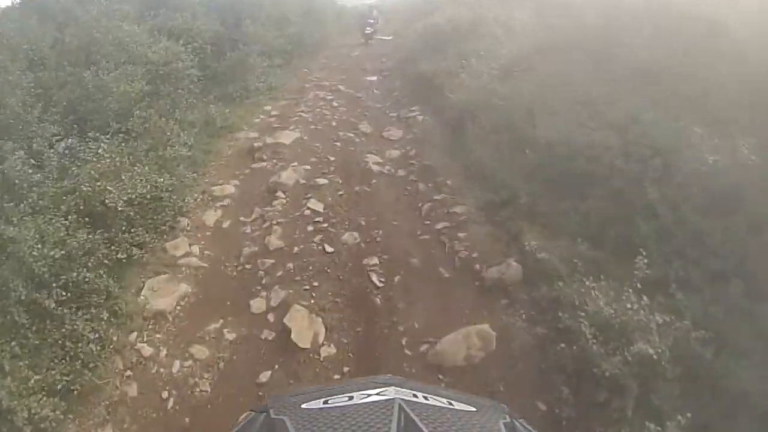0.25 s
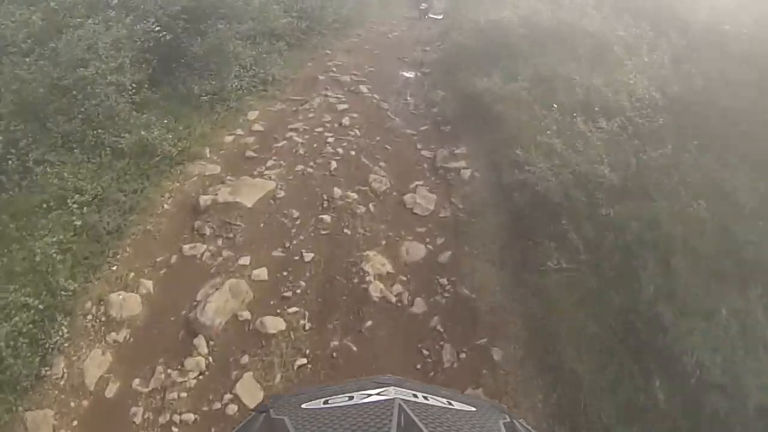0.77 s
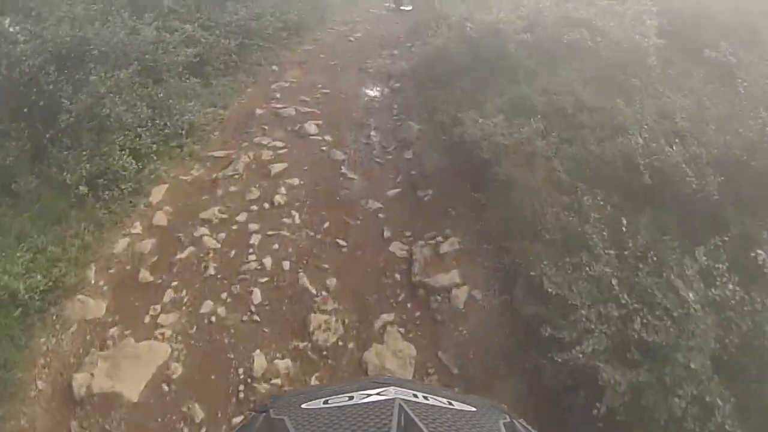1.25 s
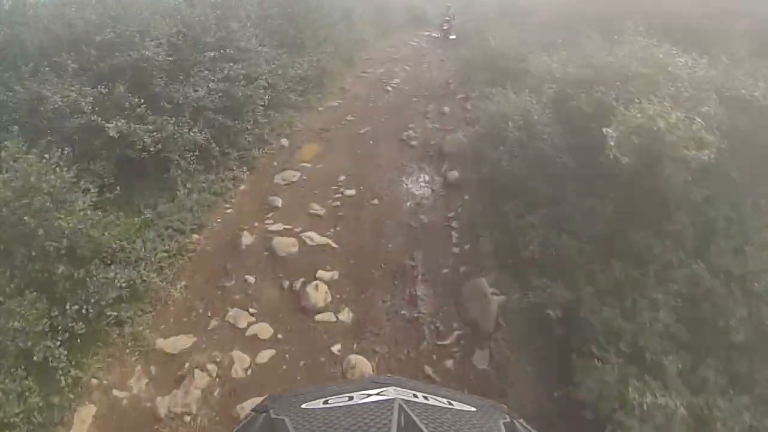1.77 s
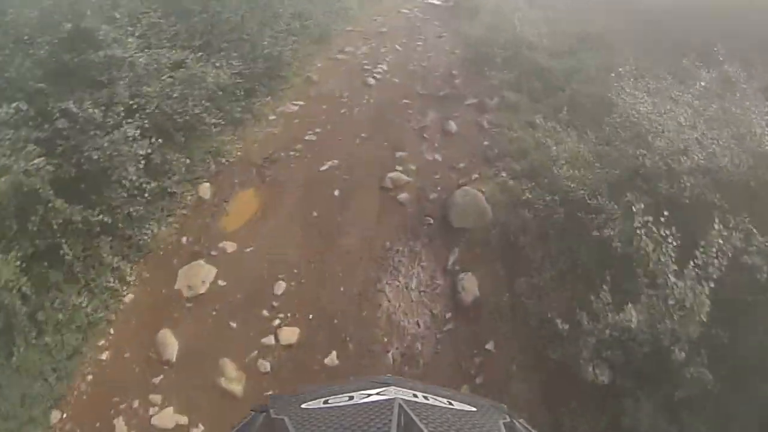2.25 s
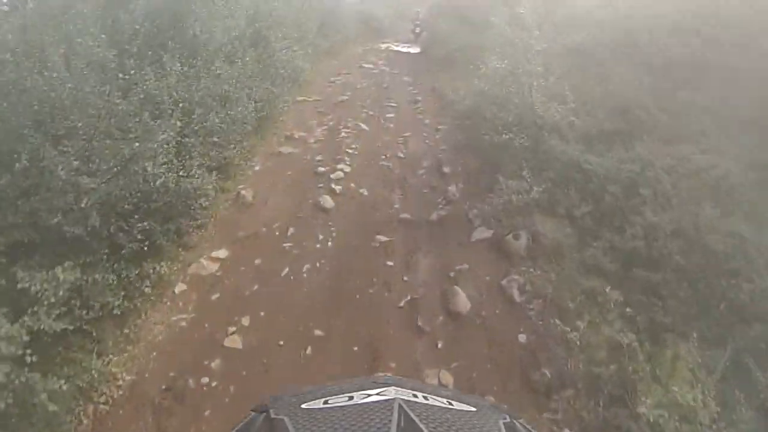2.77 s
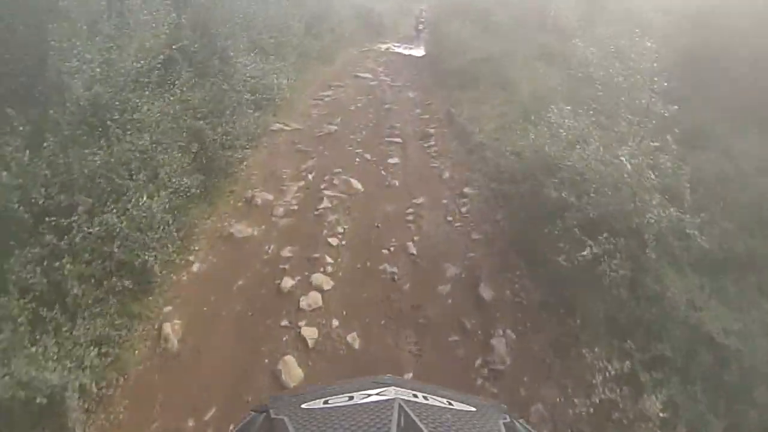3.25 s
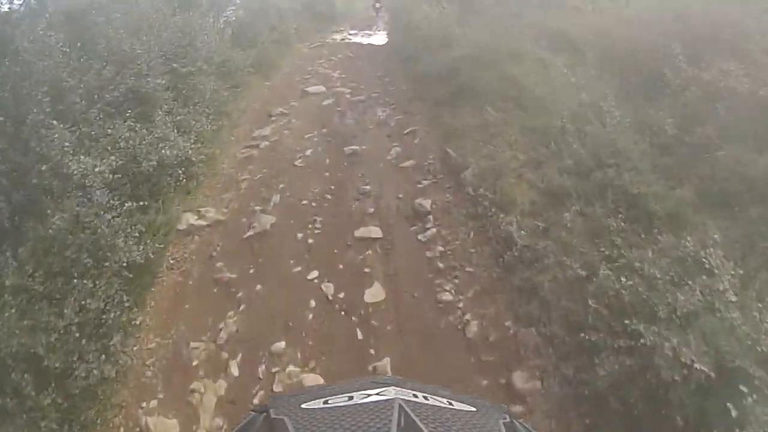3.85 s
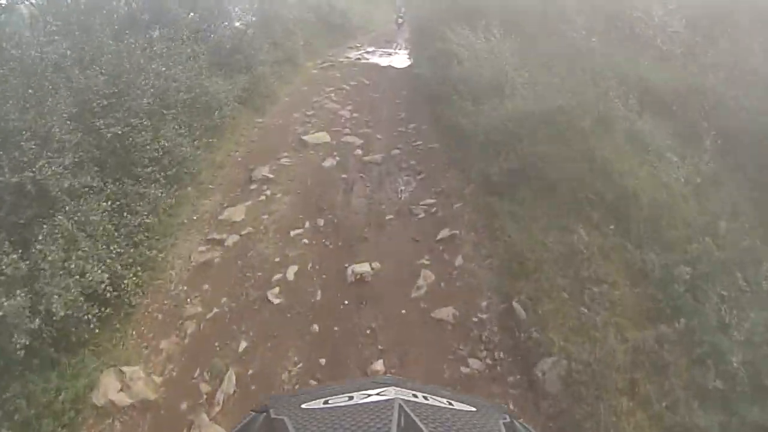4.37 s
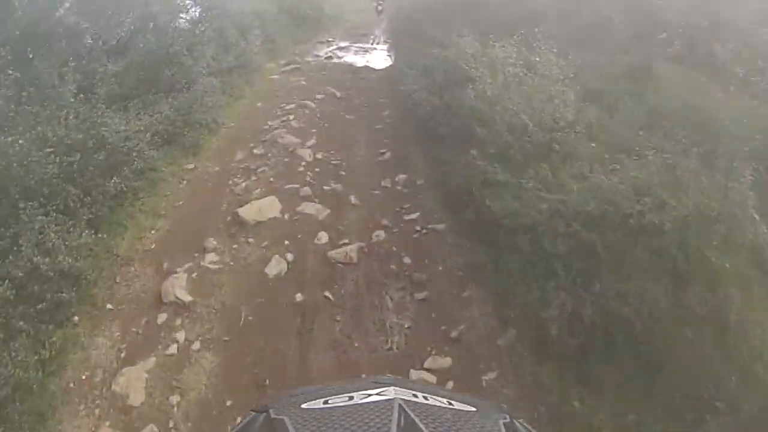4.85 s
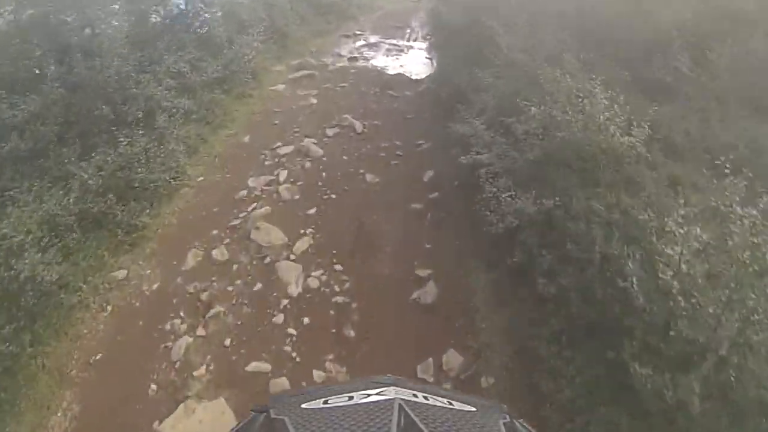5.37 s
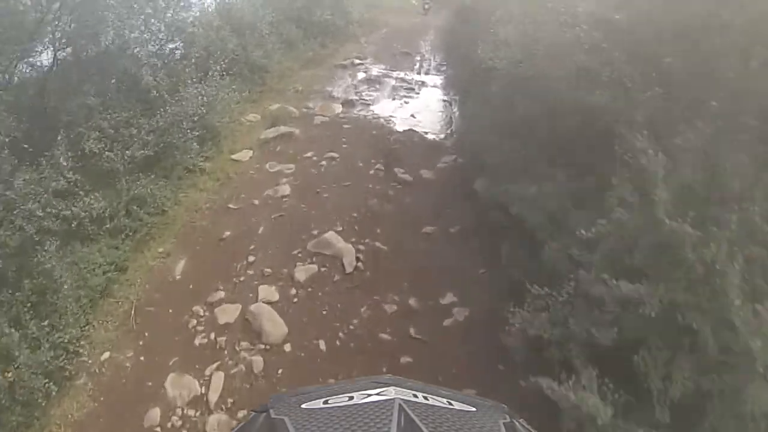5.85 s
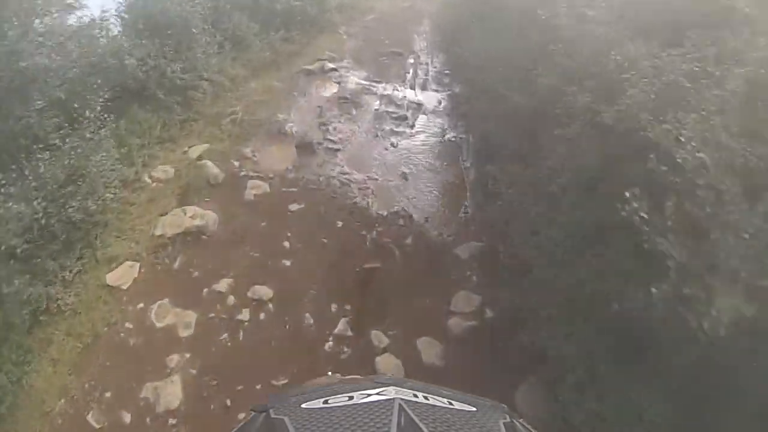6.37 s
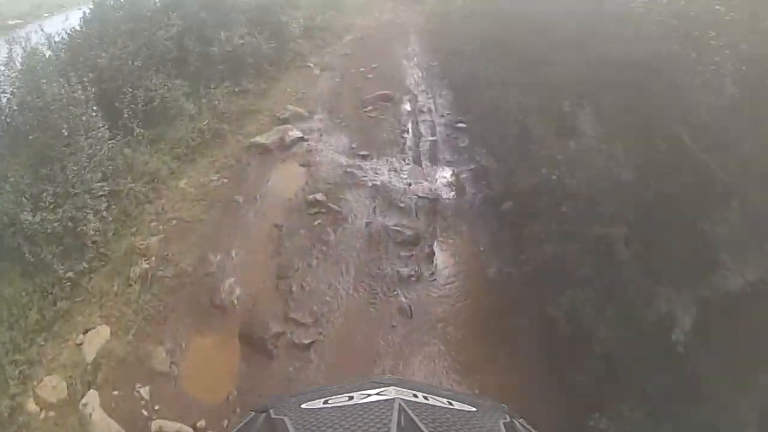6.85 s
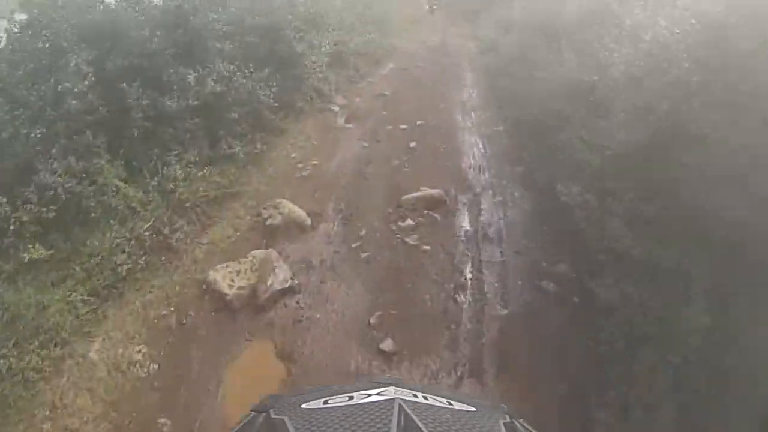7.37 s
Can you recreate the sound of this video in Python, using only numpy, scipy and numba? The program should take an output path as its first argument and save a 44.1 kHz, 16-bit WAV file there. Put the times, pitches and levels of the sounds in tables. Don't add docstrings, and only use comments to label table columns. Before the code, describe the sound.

A single-cylinder dirt bike climbs a rocky track, heard from a microphone sealed inside a camera housing on the rider. A nasal, ringing gear whine wavers with throttle and wheel slips over a low engine hum. Tyre roar and chain rattle sit beneath, while jolts bring deep rumbles and dull booms. Stone knocks cluster near two seconds, the sharpest comes near five, and faint grit sprays follow.

```python
import sys
import numpy as np
from scipy import signal
from scipy.fft import rfft, irfft, next_fast_len
from scipy.io import wavfile
from scipy.ndimage import uniform_filter1d
from numba import njit

SR = 44100
rng = np.random.default_rng(int(sys.argv[2]) if len(sys.argv) > 2 else 0)


def invert_db(x):
    u = np.asarray(x, float) / 20
    return 10 ** u


def store_wav(level_fs):
    pcm = np.round(np.clip(np.atleast_2d(level_fs), -1, 1) * 32767)
    wavfile.write(sys.argv[1], SR, pcm.T.astype(np.int16))


N = 335160

MID_HZ = 1300
WHINE_DB, DOUBLE_DB = -48.5, -56.5
HUM_DB, RATTLE_DB, TYRE_DB = -44, -63.5, -55.5


def unit(x):
    return x / np.sqrt(np.mean(x ** 2))


def noise():
    return rng.standard_normal(N)


def walk(rate_hz):
    hold = int(SR / rate_hz)
    steps = np.repeat(rng.standard_normal(N // hold + 1), hold)
    smooth = uniform_filter1d(uniform_filter1d(steps, hold), hold)
    return unit(smooth[:N])


def coloured(points):
    hz, db = np.transpose(points)
    size = next_fast_len(N)
    f = np.maximum(np.arange(size // 2 + 1) * SR / size, 1)
    gain = invert_db(np.interp(np.log(f), np.log(hz), db))
    gain = gain * np.minimum(hz[-1] / f, 1) ** 3
    spectrum = rfft(rng.standard_normal(size)) * gain
    return unit(irfft(spectrum, size)[:N])


@njit
def resonator(x, hz, width_hz):
    y, band, low = np.empty(len(x)), 0., 0.
    for i in range(len(x)):
        g = np.tan(np.pi * hz[i] / SR)
        k = width_hz / hz[i]
        v = (band + g * (x[i] - low)) / (1 + g * (g + k))
        band = 2 * v - band
        low = low + 2 * g * v
        y[i] = k * v
    return y


def steep(x, hz, width_hz):
    centre_hz = hz + np.zeros(len(x))
    once = resonator(x, centre_hz, float(width_hz))
    return resonator(once, centre_hz, float(width_hz))


def swell(start_s, attack_s, hold_s, release_s):
    corners_s = start_s + np.cumsum([0, attack_s, max(hold_s, .001), release_s])
    return np.interp(np.arange(N) / SR, corners_s, [0, 1, 1, 0])


def blows(table, attack_s, release_s, rest_db):
    lifts = [(db - rest_db) * swell(s, attack_s, hold_s, release_s) for s, hold_s, db in table]
    return rest_db + np.max(lifts, axis=0).clip(0)


# time_s [s], tooth_rate_hz [Hz], load_db [dB], judder [0-1]
THROTTLE_HAND = [(0.0, 1242, -1, 0.05), (0.57, 1254, -2.5, 0), (0.66, 1150, -4, 0.01),
                 (1.0, 1167, -5.5, 0.04), (1.3, 1323, 4.5, 0.05), (1.9, 1310, 2, 0.07), (2.04, 1199, 1, 0),
                 (2.5, 1259, -0.5, 0), (2.73, 1164, -2.5, 0.04), (2.98, 1290, 0, 0.06),
                 (3.42, 1224, -7, 0.02), (3.55, 1154, -4, 0.01), (4.27, 1152, -3.5, .03),
                 (4.45, 1270, 2, 0.04), (5.6, 1261, 3, 0.04), (6.2, 1312, -0.5, 0.02), (7.45, 1309, 1.5, 0),
                 (7.52, 1165, -6, 0)]


def throttle():
    time_s, *columns = np.transpose(THROTTLE_HAND)
    return [np.interp(np.arange(N) / SR, time_s, column) for column in columns]


# start_s [s], hold_s [s], rise_hz [Hz, tooth rate], whine_gain_db [dB]
WHEEL_SLIPS = [(-0.04, 0.032, 271, 3.5), (0.28, .13, 76, 1.5), (1.581, .1, 90, 1.5), (2.33, 0.029, 90, 1),
               (2.749, .12, 115, 6), (2.83, 0.02996, 90, -1.5), (3.741, .02, 55, 1.5),
               (3.949, 0.032, 80.5, 2.5), (4.139, 0.021, 89, 0.5), (4.549, 0.1195, 20.14, -1.5),
               (6.099, 0.1483, 15.01, 1.5), (4.82, .14, 92, 2.5), (5.191, 0.092, 155, 2),
               (5.4, 0.061, 90, 3), (5.74, .24, 130, 1.5), (6.45, .09, 120, 2), (6.75, .1, 70.14, 0),
               (7.0, .14, 125.2, 0.5), (7.35, .04, 102, 1)]


def wheel_slips():
    spin_up_s, grip_s = .045, .07
    flares = np.array([swell(s, spin_up_s, hold_s, grip_s) for s, hold_s, _, _ in WHEEL_SLIPS])
    return np.transpose(WHEEL_SLIPS)[2:] @ flares


# pitch_hz [Hz], width_hz [Hz], level_db [dB]
SHELL_MODES = [(655.5, 41, -3.5), (782.4, 13.6, -7), (1204, 89, -0.5), (1346, 56.5, 2), (1510, 147, -3.5),
               (1830, 480, -13.5), (2268, 79, -11.5), (2450, 120, -10), (2692, 103, -12.5),
               (2834, 39, -10.5), (3040, 166, -14), (3360, 590, -20), (4500, 810, -26), (6170, 620, -27.5)]


def shell(x):
    modes = enumerate(SHELL_MODES)
    return sum((-1) ** k * invert_db(db) * steep(x, hz, 1.545 * width) for k, (hz, width, db) in modes)


def gears(mesh_hz, turns, judder, gain_db):
    whine_db = WHINE_DB + 0.0154 * (mesh_hz - MID_HZ) + gain_db
    double_db = DOUBLE_DB + 0.013 * (mesh_hz - MID_HZ) + gain_db
    blur_db = 123 * judder
    wobble = 1 + judder * walk(35) + 0.0051 * np.sin(np.pi * turns)
    phase = 2 * np.pi * np.cumsum(mesh_hz * wobble) / SR
    layers = (  # harmonics, level dB, clear tone dB, backlash width Hz
        ([1], whine_db, 0, 160),
        ([2], double_db, -3.5, 310),
        ([3, 4], WHINE_DB - 22, -5, 520))
    out = 0
    for harmonics, db, tone_db, width_hz in layers:
        firing_db = 2.24 * np.cos(np.pi * turns + 2.36 * walk(9.8))
        throb = invert_db(firing_db + 0.4 * walk(13) + 1.54 * walk(55))
        tone = invert_db(1.7 * walk(90)) * sum(np.sin(k * phase) for k in harmonics)
        backlash = steep(noise(), harmonics[0] * mesh_hz * wobble, width_hz)
        contact = invert_db(tone_db - blur_db) * unit(tone) + unit(backlash)
        heard = unit(shell(contact)) + invert_db(-9.5) * unit(contact)
        out = out + invert_db(db - 2.0) * throb * unit(heard)
    return out


# order [multiple of crank rate], level_db [dB]
CRANK_ORDERS = [
    (.5, -1.5),
    (1, 1.5),
    (1.5, -23),
    (2, -24),
    (2.5, -22.5),
    (3, -17),
    (3.5, -32),
    (4, -34),
]


def crank(turns, hum_db):
    out = 0
    for order, db in CRANK_ORDERS:
        level = invert_db(db + 2.85 * walk(9))
        out = out + level * np.sin(2 * np.pi * order * turns + .8 * order * walk(16))
    return invert_db(hum_db + 1.0) * out


# pitch_hz [Hz], level_db [dB per Hz]
TYRE_SPECTRUM = [(110, 1), (170, -5), (230, -4), (450, -10.5), (1600, -14), (3500, -25.5), (5500, -37.5),
                 (9000, -60)]


def chassis(turns, rattle_db, tyre_db):
    grit = noise() * invert_db(2.22 * walk(300) + 0.4 * np.cos(np.pi * turns) + 1.34 * walk(17))
    roar = coloured(TYRE_SPECTRUM) * invert_db(1.08 * walk(17) + 1.8 * walk(200))
    rattle = steep(noise(), 4400, 4200) * invert_db(1.1 * walk(11) + 2.6 * walk(300))
    ringing = invert_db(rattle_db + 13.0) * unit(shell(grit))
    return ringing + invert_db(tyre_db + 1.73) * roar + invert_db(rattle_db - 10.0) * unit(rattle)


# start_s [s], hold_s [s], level_db [dB]
ROCK_JOLTS = [(0.02, .03, -29.5), (0.19, 0.023, -28), (0.49, 0.022, -25.5), (0.67, 0.096, -32.5),
              (1.0, 0.017, -24.5), (1.2, 0.019, -29.5), (1.4, 0.16, -23), (1.98, 0.11, -22.5),
              (2.29, .12, -28.5), (2.52, 0.29, -32.5), (2.92, 0.023, -31.5), (3.07, .15, -30.5),
              (3.57, 0.058, -31.5), (3.85, .01, -32.5), (4.43, .27, -24.5), (4.87, 0.039, -27),
              (5.19, 0.066, -22), (5.4, 0.068, -26.5), (5.72, .04, -23.5), (6.16, 0.026, -26.5),
              (6.3, .02, -33), (6.41, 0.17, -26), (6.66, .3, -28.5), (7.01, 0.16, -27), (7.25, 0.33, -29.5)]


def jolts():
    return blows(ROCK_JOLTS, attack_s=0.033, release_s=0.15, rest_db=-34.5)


# start_s [s], hold_s [s], level_db [dB]
MOUNT_THUDS = [(-0.04, 0.015, -52), (0.13, 0.081, -46.5), (0.68, 0.29, -47), (1.0, 0.13, -44.5),
               (1.27, .01, -46.5), (1.4, 0.025, -51), (1.74, 0.12, -46), (2.11, 0.022, -40),
               (2.29, 0.013, -42.5), (2.47, .05, -51), (2.8, 0.0076, -48), (2.98, .01, -44),
               (3.45, .08, -50.5), (3.9, .01, -47), (4.17, 0.058, -46), (4.68, .03, -48),
               (4.88, 0.019, -38), (5.2, .03, -56), (5.27, 0.011, -51), (5.68, 0.021, -35),
               (6.02, .02, -47), (6.29, 0.0097, -45.5), (6.6, .3, -51.5), (6.95, 0.0093, -38.5),
               (7.15, .1, -39), (7.32, .02, -36.5), (7.55, 0.021, -43)]


def thuds():
    return blows(MOUNT_THUDS, attack_s=0.039, release_s=0.1, rest_db=-52.5)


# pitch_hz [Hz], level_db [dB per Hz]
SWAY_SPECTRUM = [(1.5, -12), (4, -1), (9, 0), (14, -1), (20, -9), (30, -30)]
# pitch_hz [Hz], level_db [dB per Hz]
RUMBLE_SPECTRUM = [(10, -3), (20, 2.5), (30, -7), (40, -11.5), (52, -21.5), (65, -22.5), (120, -30),
                   (300, -45.5)]


def shaking(rumble_db, boom_db):
    rocking = invert_db(-1) * coloured(SWAY_SPECTRUM) + invert_db(-5.5) * coloured(RUMBLE_SPECTRUM)
    first = steep(noise(), 96.4, 19.0)
    second = steep(noise(), 138.2, 27.95)
    boom = unit(first) + invert_db(-16.5) * unit(second)
    return invert_db(rumble_db) * rocking + invert_db(boom_db - 1.0) * boom


# start_s [s], peak_db [dB], ring_hz [Hz], crack_minus_ring_db [dB]
STONE_KNOCKS = [(0.595, -50, 1200, 8), (1.733, -43, 1510, -8), (1.775, -37.5, 1415, -6),
                (2.03, -36.5, 1650, -1), (2.125, -52, 4500, -4), (2.36, -56, 745, 17),
                (2.384, -40, 2637, -13), (2.5, -42, 1321, -18), (4.471, -34, 1292, -28),
                (4.899, -48, 1679, 4), (4.918, -28, 1410, -11), (4.921, -44.5, 362, 8),
                (4.924, -44, 820, 5.5), (4.93, -40.5, 1412, 6), (4.992, -38.5, 1560, 2.5),
                (4.996, -44, 2770, 1), (5.085, -37, 1658, -28), (5.087, -43, 2050, -20),
                (5.436, -44, 3283, -12), (5.765, -46, 1724, -6), (6.134, -47, 1353, -18),
                (6.522, -40, 1651, -14), (7.371, -36.5, 1870, -10), (7.409, -44, 703, -10)]


def knocks():
    out = np.zeros(N)
    t = np.arange(SR // 5) / SR
    shape = np.minimum(t / 0.0014, 1) * invert_db(-60 * t / 0.056)
    for start_s, db, hz, crack_db in STONE_KNOCKS:
        burst = rng.standard_normal(len(t)) * shape
        ring = steep(burst, hz, 0.3 * hz)
        crack = steep(burst, 560, 1820)
        fizz = steep(burst, 8900, 5500)
        parts = ((db, ring), (db + crack_db, crack), (-82, fizz))
        hit = sum(invert_db(part_db) * part / np.abs(part).max() for part_db, part in parts)
        i = int(start_s * SR)
        out[i:i + len(t)] += hit[:N - i]
    return out


# [Hz, centre]
GRIT_SPRAYS = [
    (2.13, -62, 4800),
    (2.25, -63, 4726),
    (2.365, -64, 7100),
    (4.913, -66, 6100),
    (4.989, -58.5, 6100),
    (5.843, -64, 8110),
    (6.994, -63, 8600),
    (7.13, -64, 5630),
    (7.23, -64, 5610),
    (7.375, -59, 6585),
]


def sprays():
    out = np.zeros(N)
    t = np.arange(SR // 5) / SR
    shape = np.minimum(t / 0.021, 1) * invert_db(-60 * t / 0.26)
    for start_s, db, hz in GRIT_SPRAYS:
        puff = steep(rng.standard_normal(len(t)) * shape, hz, 1.1 * hz)
        i = int(start_s * SR)
        out[i:i + len(t)] += invert_db(db) * (puff / np.abs(puff).max())[:N - i]
    return out


# pitch_hz [Hz], level_db [dB per Hz]
HISS_SPECTRUM = [(1000, -5), (5000, -11), (8000, -11), (11000, -13.5), (13000, -19), (15000, -23)]


def hiss():
    return invert_db(-70.5) * coloured(HISS_SPECTRUM)


def scene():
    mesh_hz, load_db, judder = throttle()
    rise_hz, gain_db = wheel_slips()
    mesh_hz = mesh_hz + rise_hz
    turns = np.cumsum(mesh_hz / 17.3) / SR
    rumble_db = jolts()
    rough_db = uniform_filter1d(rumble_db - rumble_db.mean(), size=SR // 4)
    rattle_db = RATTLE_DB + 0.43 * load_db
    tyre_db = TYRE_DB + 0.17 * load_db + 0.21 * rough_db
    bike = gears(mesh_hz, turns, judder, gain_db)
    bike = bike + crank(turns, HUM_DB + load_db)
    bike = bike + chassis(turns, rattle_db, tyre_db)
    mix = bike + shaking(rumble_db, thuds()) + knocks() + sprays()
    return mix[None]


def top_cut(x):
    return signal.sosfilt(signal.butter(12, 14960, fs=SR, output="sos"), x)


def record(dry):
    return top_cut(dry + hiss())


dry = scene()
out = record(dry)
store_wav(out)
```